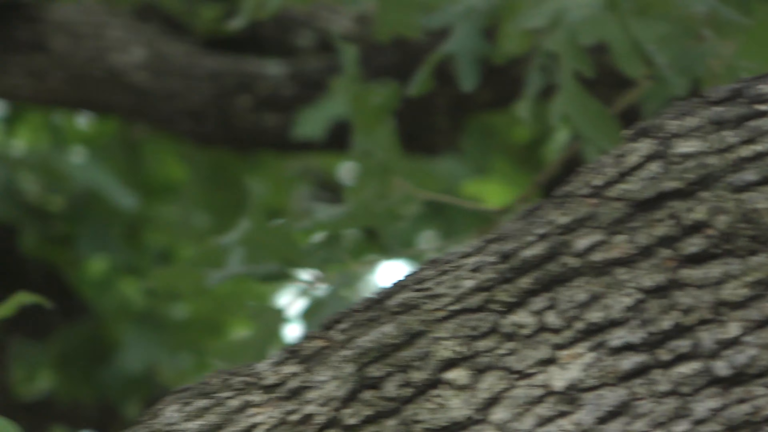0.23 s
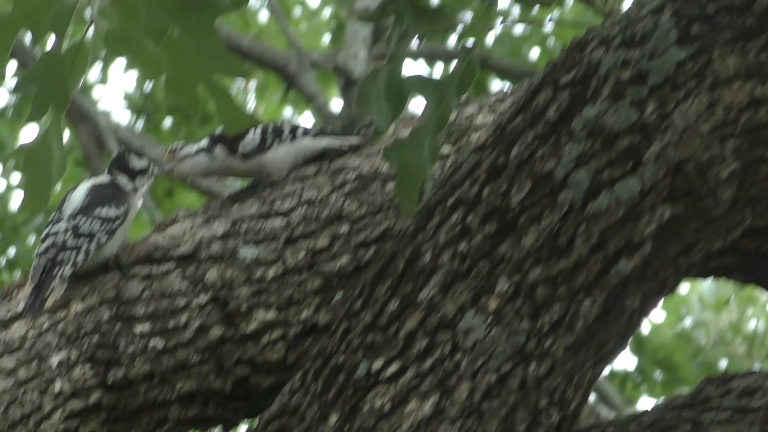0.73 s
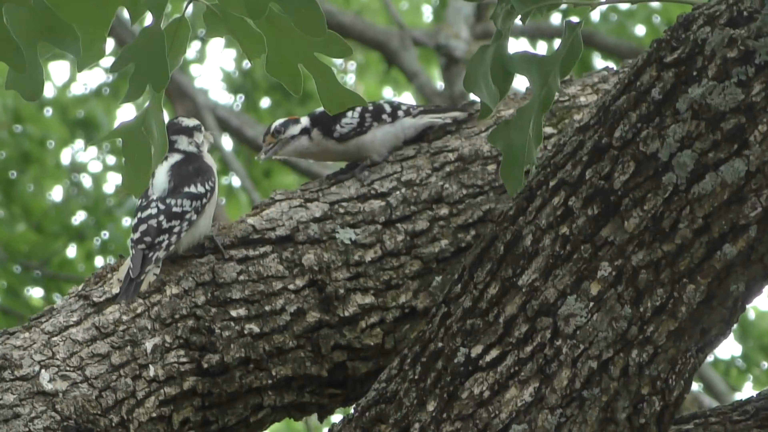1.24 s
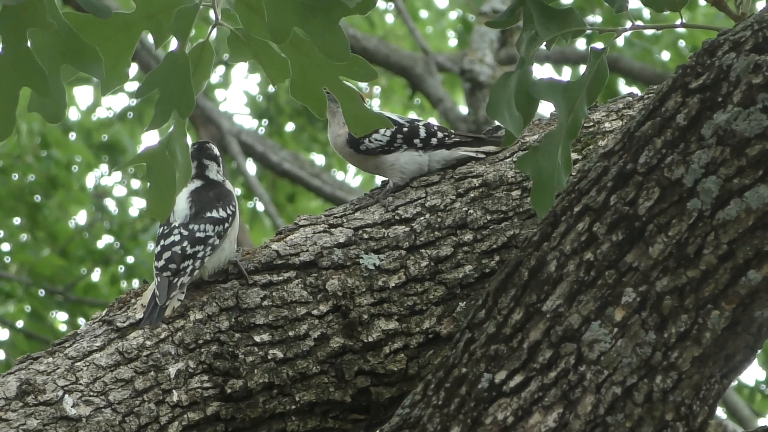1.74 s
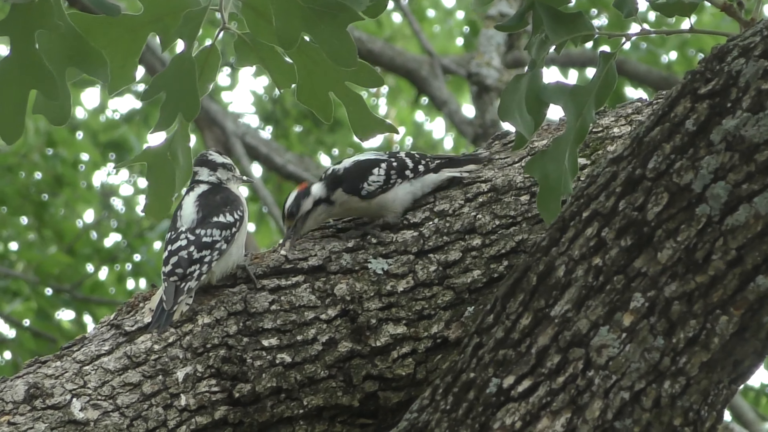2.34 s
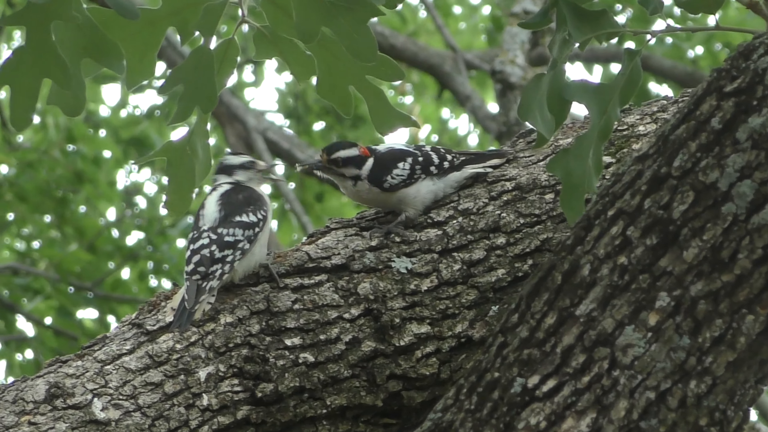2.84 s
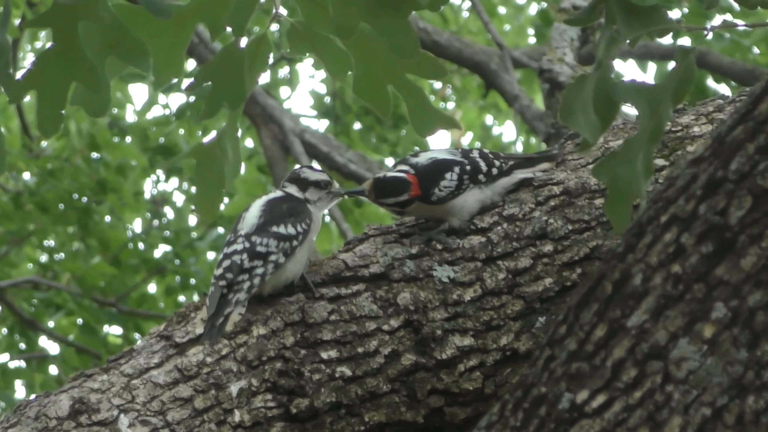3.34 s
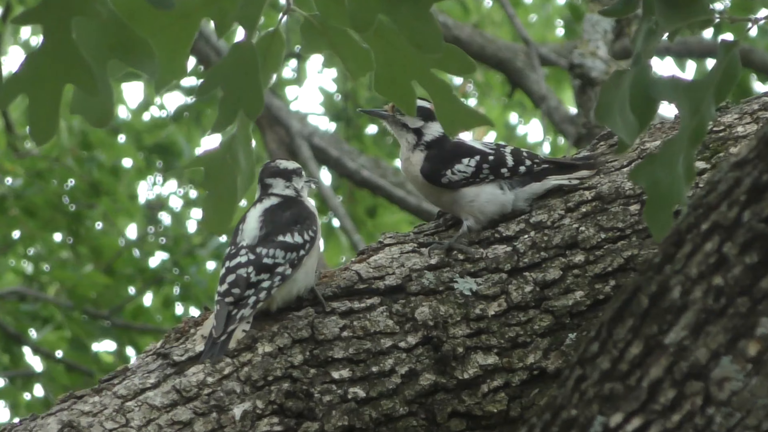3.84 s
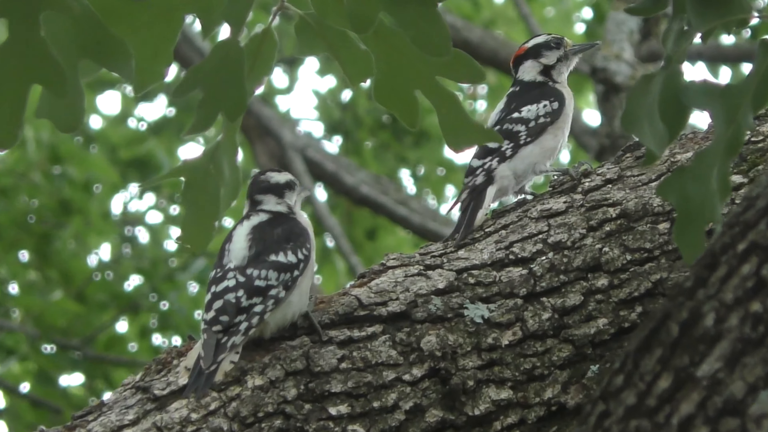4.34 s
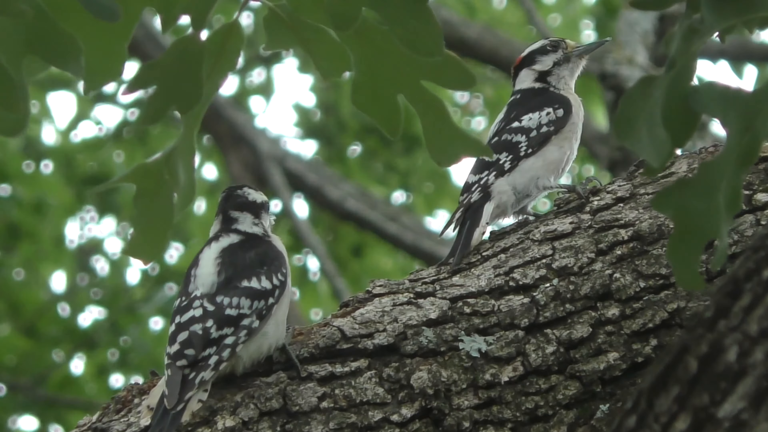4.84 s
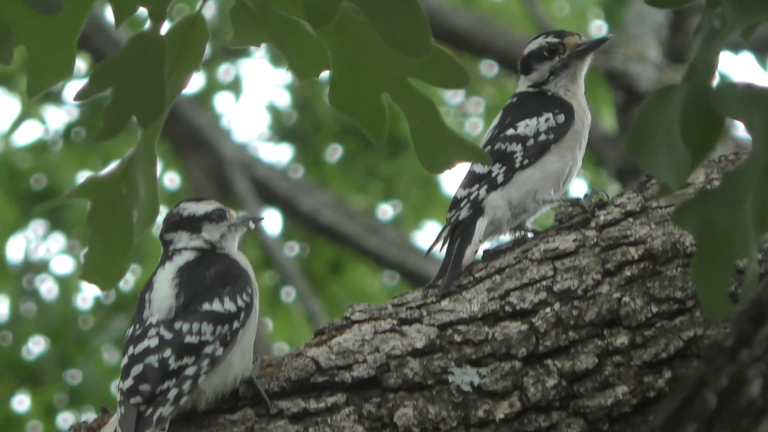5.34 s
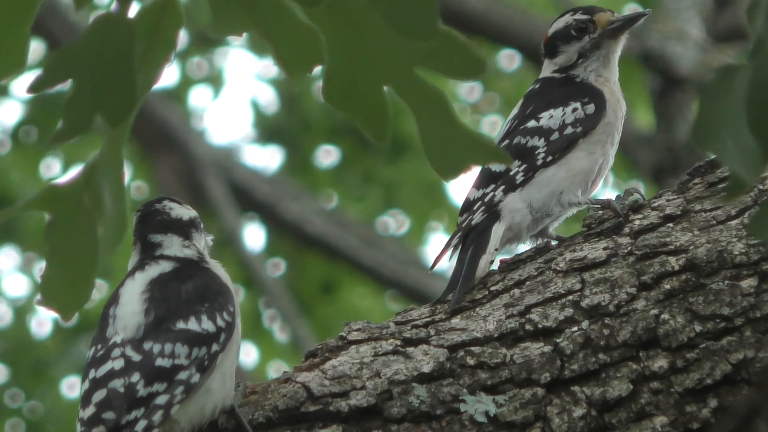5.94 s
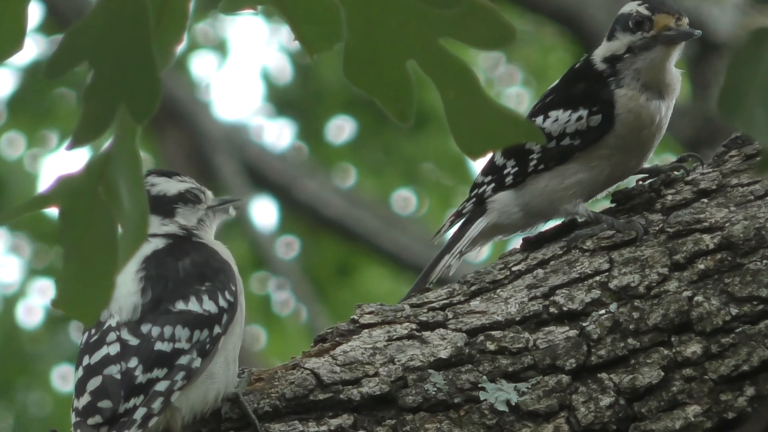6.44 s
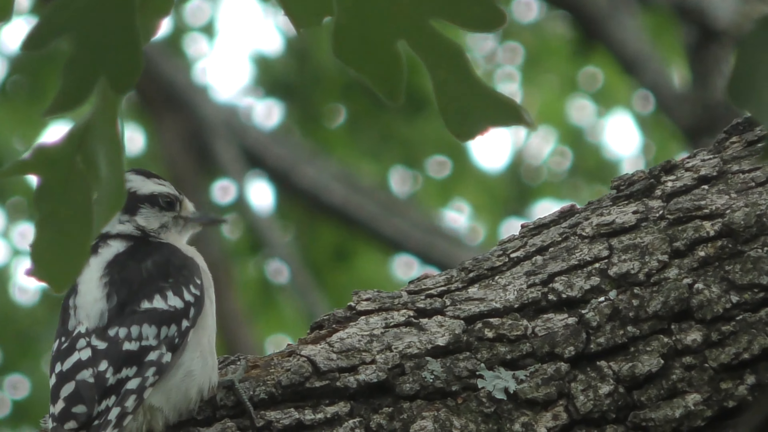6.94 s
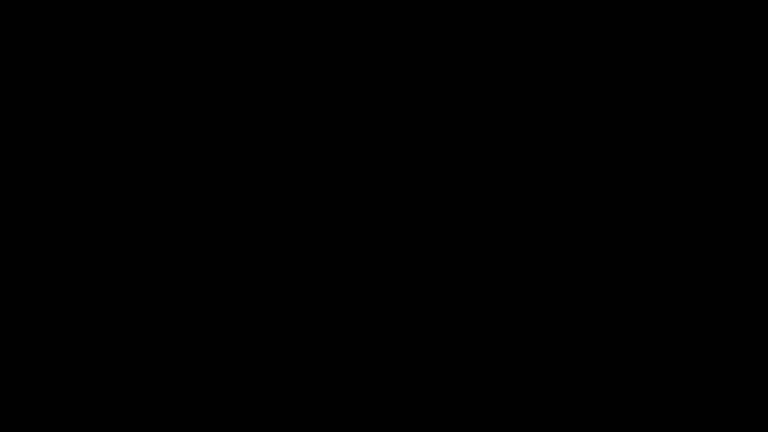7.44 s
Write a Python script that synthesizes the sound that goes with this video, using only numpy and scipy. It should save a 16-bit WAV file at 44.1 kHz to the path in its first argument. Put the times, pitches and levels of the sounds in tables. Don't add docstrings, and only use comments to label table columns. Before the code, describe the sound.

A young woodpecker in a tree gives rapid short high chirps and buzzy wheezes over a quiet low hum, with distant birds whistling and trilling late.

```python
import sys
import numpy as np
from scipy import signal
from scipy.fft import rfft, irfft
from scipy.io import wavfile
from scipy.ndimage import uniform_filter1d, map_coordinates

SR = 44100
rng = np.random.default_rng(int(sys.argv[2]) if len(sys.argv) > 2 else 0)


def magnitude_from_level(level_db):
    exponent = np.asarray(level_db, float) / 20
    return 10 ** exponent


def persist_wave(psi):
    counts = np.round(np.clip(psi, -1, 1) * 32767).astype(np.int16)
    wavfile.write(sys.argv[1], SR, np.atleast_2d(counts).T)


N = 339570
CUT_S = 0.343


def unit(x):
    return x / np.sqrt(np.mean(x ** 2) + 1e-20)


def along(points, hz):
    f, v = np.transpose(points)
    return np.interp(np.log(hz + 1), np.log(f + 1), v)


def wobble(rate, size=N):
    knots = rng.standard_normal(int(size * rate / SR) + 4)
    return map_coordinates(knots, [np.arange(size) * rate / SR])


def rush(gain, patchy_db):
    # hz, likeness (0 to 1)
    likeness = [(60, 0.21), (130, 0.45), (290, 0.83), (640, 0.72), (1410, 0.45), (3100, 0.31), (6820, 1),
                (15000, 0.4)]
    # hz, left_minus_right_db
    lean_points = [(60, -2), (110, 0.5), (200, 0), (380, -3), (700, -3), (1290, -4), (2380, -0.5),
                   (4400, 0.0), (8120, -0.5), (15000, 0.5)]
    z = signal.stft(rng.standard_normal((2, N + 512)), nperseg=512)[2]
    field = uniform_filter1d(rng.standard_normal(z.shape[1:]), 6, 0)
    field = uniform_filter1d(field, 14, 1)
    pair = signal.istft(z * magnitude_from_level(patchy_db * unit(field)), nperseg=512)[1][:, :N]
    hz = np.fft.rfftfreq(N, 1 / SR)
    angle = np.arccos(np.clip(along(likeness, hz), -1, 1)) / 2
    mid, side = rfft(pair) * gain(hz) * [np.cos(angle), np.sin(angle)]
    lean = magnitude_from_level(along(lean_points, hz) / 2)
    return unit(irfft([(mid + side) * lean, (mid - side) / lean], N))


def add(out, s, call, pan_db, wet_db, t60, rise, wide, gap=0):
    t = np.arange(SR // 2) / SR
    late = np.maximum(t - gap, 0)
    decay = magnitude_from_level(-60 * late / t60 + 3 * wobble(300, size=len(t))) * (1 - np.exp(-late / rise))
    a, b = rng.standard_normal((2, len(t))) * decay
    echoes = np.array([a + wide * b, a - wide * b]) * magnitude_from_level(wet_db) / np.linalg.norm(a)
    echoes[:, 0] = magnitude_from_level([min(pan_db, 0), min(-pan_db, 0)])
    heard = signal.fftconvolve(call[None], echoes, axes=1)
    start = round(s * SR)
    limit = round(CUT_S * SR) if s < CUT_S - 0.02 else N
    stop = min(start + heard.shape[1], limit)
    heard *= np.clip((stop - start - np.arange(heard.shape[1])) / (0.003 * SR), 0, 1)
    out[:, max(start, 0):stop] += heard[:, max(-start, 0):stop - start]


def surroundings(begging):
    # start_s, rumble_db
    town = [(0.75, -55), (1.99, -56.5), (2.29, -56), (2.44, -57.5), (2.67, -57.5), (2.87, -55.5),
            (4.59, -58.5), (4.65, -61), (6.23, -59.5), (6.55, -56), (6.87, -57), (7.2, -56.5)]
    # hz, level_db (per Hz)
    rumble_band = [(15, -93), (25, -48.5), (75, -70), (83, -47), (97, -10.5), (184, -4), (233, -3.5),
                   (264, -2), (418, -2.5), (700, -23), (910, -36.5), (1540, -120)]
    # hz, level_db (per Hz)
    murmur_band = [(350, -94.5), (600, -4.5), (746, -2.5), (808, -7), (1270, -1.5), (2430, -8.5),
                   (2730, -9.5), (3400, -18.5), (4420, -24), (7480, -120)]
    # hz, level_db (per Hz)
    air_band = [(1760, -7.5), (3000, -1.5), (3690, -1), (4440, -4.5), (6060, -9.5), (7510, -14),
                (9230, -10.5), (11000, -19.5), (14500, -25), (15600, -40.5)]
    # pitch_hz, width_hz, level_db (relative to the air)
    insects = [
        (9430, 300, -10),
        (10230, 110, -17),
    ]
    # levels in dB of rumble, murmur, air
    earlier_db = [-62.5, -70.5, -84]
    t = np.arange(N) / SR
    s, town_db = np.transpose(town)
    mean_db = town_db.mean()
    swell_db = np.interp(t, s, town_db - mean_db)
    fade = np.clip(np.minimum((t - CUT_S) / 0.2, 1 - (t - 7.23) / 0.66), 0.1, 1)
    later = fade * magnitude_from_level([mean_db + 1.0 + swell_db, -62.5 + 0.5 * swell_db, -75 + 0.85 * swell_db])
    lingering = magnitude_from_level(22.5 * np.exp(-(t / 0.092) ** 2))
    earlier = magnitude_from_level(earlier_db)[:, None] * [np.clip(t / 0.055, 0.3, 1), 1.3 - 2.0 * t, lingering]
    rumble, murmur, air = np.where(t < CUT_S, earlier, later)
    crown_s = 0.55
    spread = signal.fftconvolve(begging[0] ** 2, np.exp(-t[:SR] / crown_s) / (crown_s * SR))[:N]
    hiss = np.sqrt(air ** 2 + magnitude_from_level(2 * -33.5) * np.abs(spread) * (t > CUT_S))
    out = rumble * magnitude_from_level(-1.05) * rush(lambda f: magnitude_from_level(along(rumble_band, f)), patchy_db=0.5)
    out += machine(rumble)
    out += murmur * magnitude_from_level(2.5) * rush(lambda f: magnitude_from_level(along(murmur_band, f)), patchy_db=1.26)
    out += hiss * magnitude_from_level(7.5) * rush(lambda f: magnitude_from_level(along(air_band, f)), patchy_db=2.0)
    for hz, width_hz, db in insects:
        out += air * magnitude_from_level(db) * rush(lambda f: np.exp(-((f - hz) / width_hz) ** 2), patchy_db=3.0)
    return out


def machine(rumble):
    # start_s, level_db (2nd order)
    load = [
        (0.4, -79),
        (0.87, -62),
        (1.54, -66),
        (1.7, -77),
        (1.84, -69.5),
        (2.6, -80.5),
        (6.54, -69.5),
        (6.62, -64.5),
        (7.7, -80),
    ]
    # multiple, level_db (over the mean load), follows (share of the load swing)
    orders_low = [(2, 4, 1), (3, 4, 0.23)]
    # multiple, level_db (relative to the rumble)
    orders_up = [(4, -10.5), (4.5, -7), (6, -8.5), (8, -10.5), (10, -17.5)]
    shaft_hz = 52.86 * (1 + 0.00401 * wobble(0.7))
    turn = 2 * np.pi * np.cumsum(shaft_hz) / SR + np.array([[-0.15], [0.15]])
    s, load_db = np.transpose(load)
    mean_db = load_db.mean()
    swing_db = np.interp(np.arange(N) / SR, s, load_db - mean_db)
    out = np.zeros((2, N))
    for k, db, follows in orders_low:
        level = magnitude_from_level(mean_db + db + follows * swing_db + 3.5 * wobble(6))
        out += level * np.sin(k * turn + 0.53 * wobble(5))
    for k, db in orders_up:
        level = rumble * magnitude_from_level(db + 0.71 * wobble(1.145) + [[-1.2], [1.2]])
        out += level * np.sin(k * turn[0] + 0.47 * wobble(4))
    return out


def chirps():
    # start_s, level_db (2nd partial), pitch_hz (top), gape_db (3rd partial relative to 2nd)
    calls = [(-.025, -48, 2740, -2), (0.036, -47.5, 2760, -3), (0.344, -64.5, 3065, 9.5),
             (0.451, -43, 3120, 5), (0.613, -46.5, 3074, 3), (.819, -46, 3060, -5.5),
             (1.02, -44, 3070, -0.5), (1.591, -46.5, 2960, -3.5), (1.805, -57.5, 2807, -7.5),
             (1.991, -48.5, 3086, 3), (2.26, -44.5, 3123, 0), (2.563, -64, 2780, 2),
             (2.734, -44.5, 3146, 3.5), (2.887, -43, 3215, 5.5), (3.047, -40, 3112, -1),
             (3.116, -52.5, 3030, 8), (3.301, -63, 3130, -9.5), (3.444, -52.5, 3100, -4.5),
             (3.661, -52.5, 3076, 3.5), (4.073, -47, 3107, -3), (4.364, -53.5, 2740, -5),
             (5.016, -56.5, 2860, -5), (5.316, -54.5, 2914, -4.5), (5.715, -53.5, 2750, -2),
             (6.214, -50.5, 2860, -2), (6.469, -52.5, 2744, -0.5), (6.672, -47.5, 2764, -2.5)]
    # hz, gain_db
    throat = [(2000, -13), (2600, -16.5), (3100, -10.5), (3700, 4), (4400, 1), (4900, 0.5), (6200, 5.5),
              (9500, 2), (11000, -9), (12500, -18), (14000, -25.5), (16000, -28.5)]
    out = np.zeros((2, N))
    for s, db, hz, third_db in calls:
        above_khz = (hz - 3000) / 1000
        length = 0.032 + 0.0008 * third_db + 0.014 * above_khz
        t = np.arange(int((length + 0.00545) * SR)) / SR
        drop = np.exp((t - t[-1]) / 0.00365)
        climbed = 0.271 + 0.008 * (db + 47)
        lost = 0.265 + 0.008 * (db + 47.5) + 0.121 * (s < CUT_S / 2)
        arch = 1 - climbed * np.exp(-t / 0.00469) - lost * drop
        pitch = hz * arch * (1 + 0.007 * wobble(338, size=len(t)))
        phase = 2 * np.pi * np.cumsum(pitch) / SR
        first_db = -4 + 12.5 * above_khz - along(throat, hz)
        bright_db = third_db + 1.0 * (db + 49)
        source = [first_db, 0, third_db, bright_db, bright_db - 7.5 + 0.6 * (db + 45)]
        tone = np.zeros(len(t))
        for k, partial_db in enumerate(source, 1):
            rasp = 1 + 0.25 * wobble(348, size=len(t))
            rasp += np.exp(-t / 0.0085) * wobble(1000, size=len(t))
            level = magnitude_from_level(partial_db + along(throat, k * pitch) - 6.1 * abs(k - 2) * drop)
            tone += level * rasp * np.sin(k * phase)
        shape = (1 - np.exp(-t / 0.0042)) ** 2 * (1 - np.exp((t - t[-1]) / 0.0011))
        add(out, s - 0.006, magnitude_from_level(db - 1.5) * shape * tone, pan_db=0, wet_db=2, t60=0.2, rise=0.003, wide=0.27)
    return out


def wheezes():
    # start_s, level_db (peak), throat_hz, length_s
    calls = [(.003, -66, 7860, 0.0079), (.426, -49, 6370, 0.022), (0.597, -41.5, 8400, .025),
             (0.793, -41, 7950, 0.033), (0.987, -41, 7240, 0.036), (1.387, -49, 6530, 0.03),
             (1.571, -46, 5870, 0.058), (2.71, -45.5, 5740, 0.051), (2.858, -48, 7440, 0.023),
             (3.022, -43.5, 7500, 0.053), (3.264, -54.5, 6800, 0.023), (3.425, -41, 6630, 0.043),
             (3.663, -35, 6000, .011), (4.353, -50.5, 6600, 0.02), (5.003, -59.5, 5900, 0.018),
             (5.322, -60, 7800, 0.015), (6.447, -61.5, 7100, 0.026), (6.634, -57, 6100, 0.042)]
    out = np.zeros((2, N))
    for s, db, hz, length in calls:
        rate_hz = 857 + 1.07 * (db + 46)
        t = np.arange(int(length * SR)) / SR
        unsteady = 1 + 0.077 * t / length * wobble(419, size=len(t))
        phase = 2 * np.pi * np.cumsum(rate_hz * unsteady) / SR
        width_hz = 400 + 1300 * t / length
        buzz = np.zeros(len(t))
        for k in range(5, 15):
            passed = np.exp(-((k * rate_hz - hz) / width_hz) ** 2)
            buzz += passed * (1 + 1.64 * wobble(546, size=len(t))) * np.sin(k * phase)
        shape = np.sin(np.pi * t / length) ** 1.04
        add(out, s, magnitude_from_level(db - 14.5) * shape * buzz, pan_db=-2, wet_db=9.5, t60=0.14, rise=0.002, wide=0.043)
    return out


def slur(s, length, from_hz, to_hz, db):
    u = np.linspace(0, 1, num=21)
    curved = np.clip(0.101 / length, 0, 1)
    glide = curved * np.sin(np.pi / 2 * u ** 0.95) ** 2 + (1 - curved) * u
    loudest = 0.5
    rising_db = -18 * np.abs(1 - u / loudest) ** 1.45
    swell_db = np.where(u < loudest, rising_db, -30 * length * (u - loudest))
    return np.transpose([s + length * u, from_hz + (to_hz - from_hz) * glide, db + swell_db])


def note(s, length, hz, db, attack, attack_db, release_db, sag):
    top = s + attack * length
    return [(s, hz * (1 + sag), db + attack_db), (top, hz, db), (s + length, hz * (1 - sag), db + release_db)]


def sing(phrases, gain_db, flutter, flutter_db, flutter_rate, **place):
    out = np.zeros((2, N))
    for rows in phrases:
        s, hz, db = np.transpose(rows)
        t = np.arange(s[0], s[-1], 1 / SR)
        pitch = np.interp(t, s, hz) * (1 + flutter * wobble(flutter_rate, size=len(t)))
        level = magnitude_from_level(gain_db + np.interp(t, s, db) + flutter_db * wobble(flutter_rate / 2, size=len(t)))
        edges = np.minimum(1, np.minimum((t - s[0]) / 0.003, (s[-1] - t) / 0.0054))
        add(out, s[0], level * edges * np.sin(2 * np.pi * np.cumsum(pitch) / SR), **place)
    return out


def whistler():
    # start_s, length_s, from_hz, to_hz, level_db
    slurs = [
        (0.166, 0.091, 2300, 2380, -63.5),
        (0.293, 0.049, 2360, 2690, -53),
        (4.105, .22, 2376, 3150, -58),
        (6.073, 0.24, 2303, 3040, -53),
        (6.818, 0.087, 1843, 2372, -50),
        (7.104, .095, 1816, 2445, -48.5),
        (7.337, 0.097, 1723, 2346, -50),
        (7.568, 0.088, 1763, 2354, -56),
    ]
    # start_s, length_s, pitch_hz, level_db
    pips = [
        (6.554, .07, 1944, -47),
        (7.012, .07, 3150, -71),
    ]
    far_right = dict(flutter=0.0076, flutter_db=3.5, flutter_rate=194.7, pan_db=-32)
    rises = [slur(*row) for row in slurs]
    level_notes = [note(*row, attack=0.42, attack_db=-16, release_db=-8, sag=-0.0069) for row in pips]
    out = sing(rises, gain_db=11.0, wet_db=-7.0, t60=0.2, rise=0.0036, wide=0.61, gap=0.023, **far_right)
    out += sing(level_notes, gain_db=9.5, wet_db=-21.5, t60=0.32, rise=0.015, wide=0.8, gap=0.022, **far_right)
    return out


def burry_bird():
    # start_s, length_s, pitch_hz, level_db
    burrs = [
        (0.175, .09, 4300, -62.5),
        (.275, 0.1, 4250, -64),
    ]
    rows = [note(*row, attack=0.25, attack_db=-10, release_db=-19, sag=0.0089) for row in burrs]
    return sing(rows, gain_db=3.0, flutter=0.049, flutter_db=3, flutter_rate=990,
                pan_db=-4, wet_db=-8.0, t60=0.27, rise=0.01, wide=0.94)


def ticks():
    # start_s, level_db (peak), ring_hz, t60_s
    knocks = [
        (0.724, -46, 4250, 0.0088),
        (0.728, -37.5, 2760, 0.018),
        (.7325, -37, 1034, 0.029),
        (6.196, -45.5, 4100, 0.013),
        (6.199, -50.5, 1620, 0.056),
    ]
    out, t = np.zeros((2, N)), np.arange(SR // 10) / SR
    high_pass = signal.butter(2, 700, "high", fs=SR, output="sos")
    for s, db, hz, t60 in knocks:
        ring = np.sin(2 * np.pi * hz * t) * (1 - np.exp(-t * hz / 0.19))
        crack = 1.35 * uniform_filter1d(rng.standard_normal(len(t)), size=5)
        knock = signal.sosfilt(high_pass, magnitude_from_level(db - 60 * t / t60) * (ring + crack))
        add(out, s, knock, pan_db=0, wet_db=-5, t60=0.15, rise=0.002, wide=0.4)
    return out


def trilling_bird():
    # start_s, length_s, pitch_hz, level_db
    trills = [
        (6.485, 0.067, 6950, -62),
        (6.746, 0.12, 6960, -57.5),
        (7.032, .12, 6890, -59.5),
        (7.173, .035, 7430, -65),
        (7.274, 0.083, 6860, -56.5),
        (7.504, 0.09, 7020, -64.5),
    ]
    rows = [note(*row, attack=0.4, attack_db=-10, release_db=-8, sag=0.0036) for row in trills]
    return sing(rows, gain_db=0.5, flutter=0.02, flutter_db=4, flutter_rate=500,
                pan_db=-2.0, wet_db=-5, t60=0.31, rise=0.0078, wide=0.075)


def scene():
    since_cut = np.arange(N) / SR - CUT_S
    fade_in = np.where(since_cut < 0, 1, np.minimum(since_cut / 0.019, 1))
    begging = (chirps() + wheezes()) * fade_in
    birds = begging + whistler() + burry_bird() + trilling_bird()
    return birds + ticks() + surroundings(begging)


def low_pass(x):
    return signal.sosfilt(signal.butter(12, 15740, fs=SR, output="sos"), x)


def record(dry):
    hz = np.fft.rfftfreq(N, 1 / SR)
    limited = irfft(rfft(dry) * (hz < 15740) / (1 + (45 / (hz + 1)) ** 3), N)
    return low_pass(limited)


dry = scene()
out = record(dry)
persist_wave(out)
```